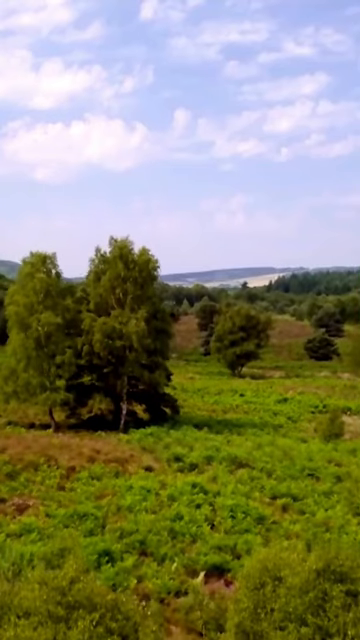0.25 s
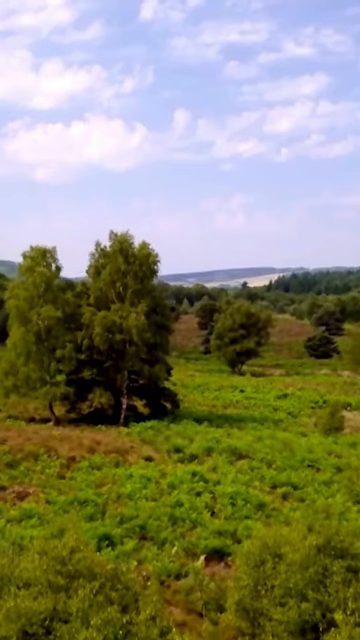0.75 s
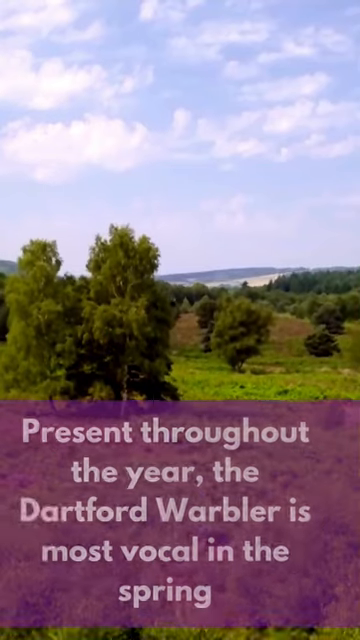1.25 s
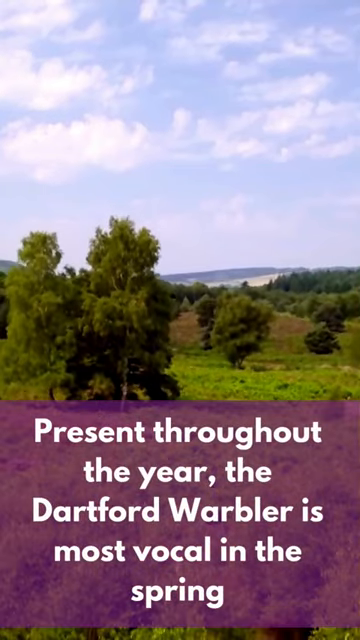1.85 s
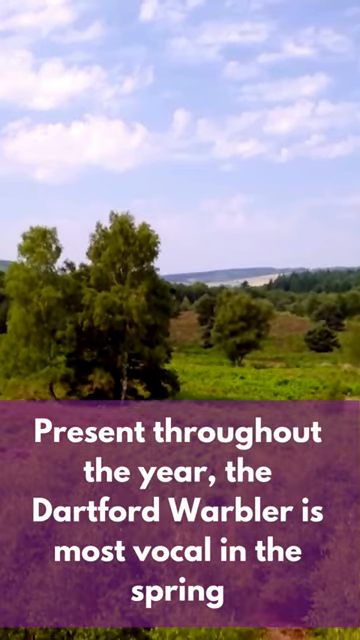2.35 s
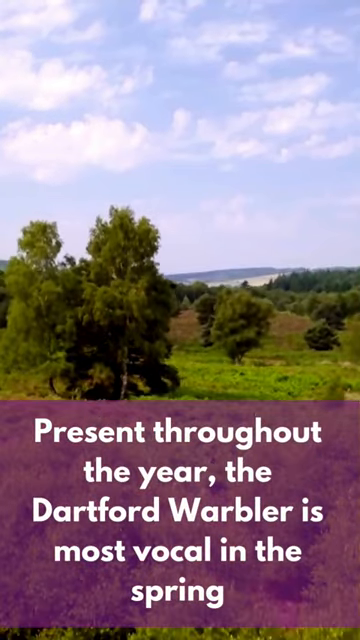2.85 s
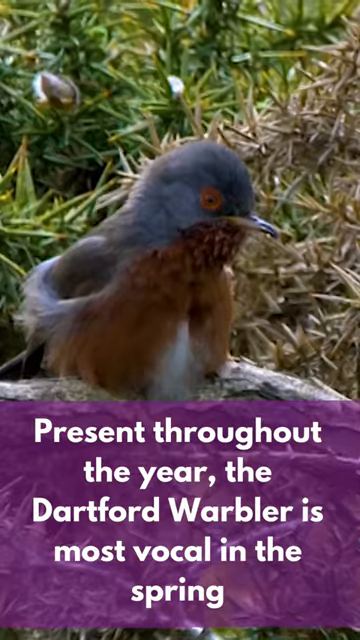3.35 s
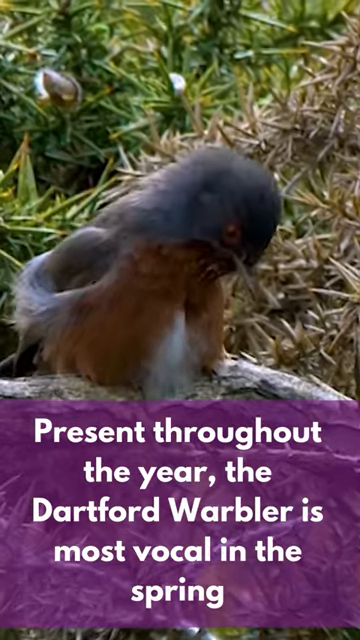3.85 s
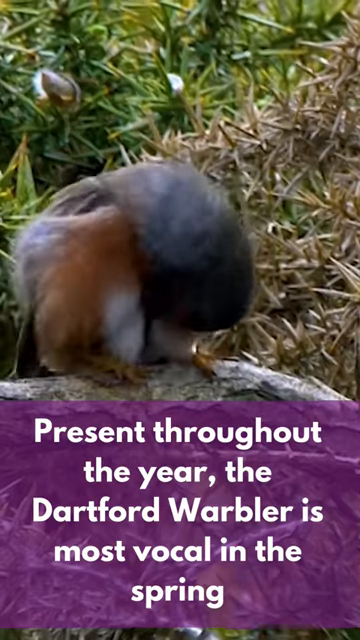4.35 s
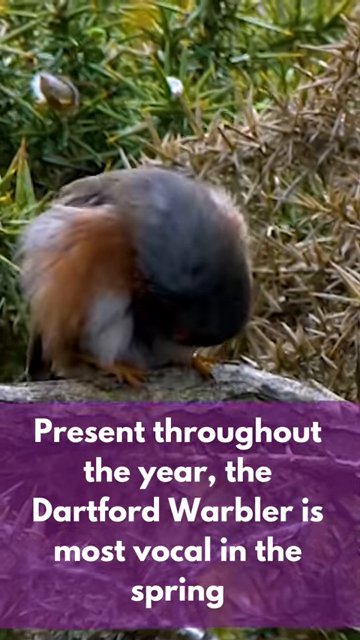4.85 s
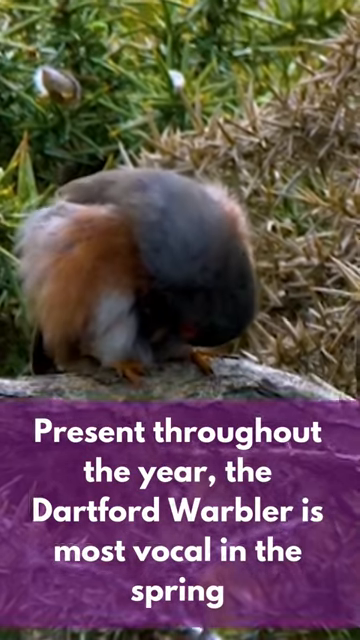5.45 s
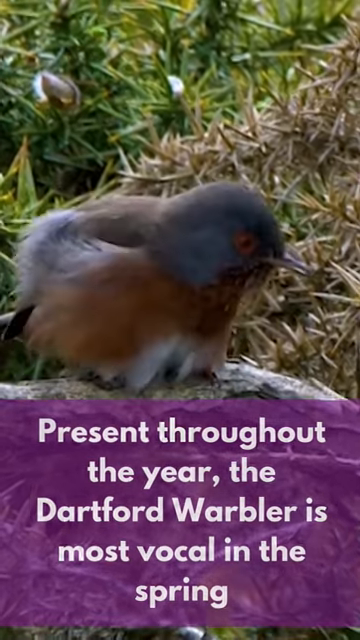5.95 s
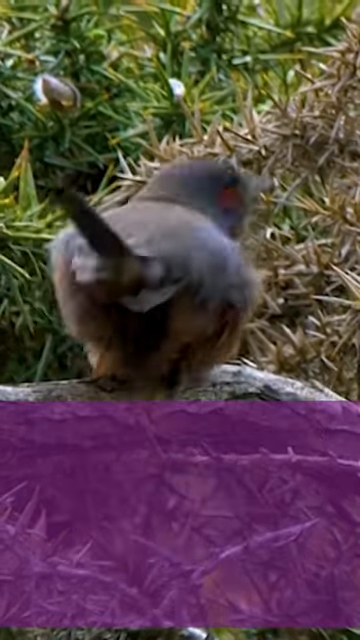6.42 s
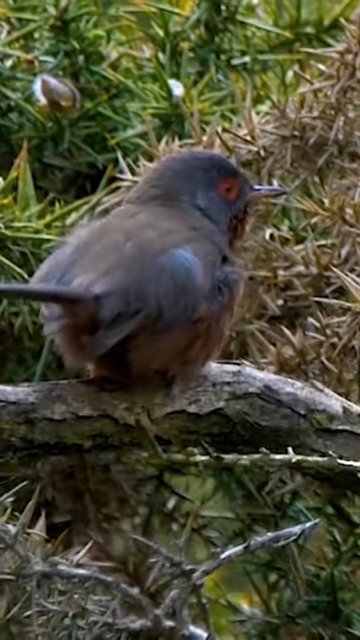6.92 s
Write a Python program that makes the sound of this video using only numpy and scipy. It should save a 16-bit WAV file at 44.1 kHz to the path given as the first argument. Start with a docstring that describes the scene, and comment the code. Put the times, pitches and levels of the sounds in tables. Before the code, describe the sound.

A rapid, scratchy warbler song fills the first third, clear and fairly near the microphone: rough buzzing, bright whistled strokes, fluttering trills, chattering rattles with upward flicks. It ends abruptly, leaving a hushed heath with low gusty rumble on the microphone, a faint airy rustle in gorse, sparse dry ticks, distant twitter, thin falling seeps and soft rising whistles from other birds far off.

```python
"""Harsh buzzes open a small warbler's scratchy bout, over wind rumbling on the microphone and rustling gorse.
The buzzes and hoarse rasps are stacks of fluttering harmonics; slurs, trills and rattles are bending tones.
Further off, near-pure tones make a rising whistle, thin falling notes, faint twitter and a low drone.
Shaped noise makes the wind and leaves, short noise bursts make twig ticks, and bushes return a short echo."""
import sys
import numpy as np
from scipy import signal
from scipy.fft import rfft, irfft
from scipy.io import wavfile
from scipy.ndimage import uniform_filter1d

SR = 44100
rng = np.random.default_rng(int(sys.argv[2]) if len(sys.argv) > 2 else 0)


def wav_out(sig):
    """Save sig, one row per channel (or a flat mono array), as 16-bit PCM at SR to the path in sys.argv[1]."""
    wavfile.write(sys.argv[1], SR, np.round(np.clip(np.atleast_2d(sig).T, -1, 1) * 32767).astype(np.int16))


N = 316638  # length of the scene in samples

# What the throat and beak let through. Each row: frequency in Hz, relative gain in dB.
THROAT_GAIN = [(700, -61), (1450, -21), (2300, -21.5), (2900, -8.5), (3500, 5.5), (3900, -3), (4400, 0),
               (5100, -6.5), (5700, -16), (6100, -28.5), (6700, -26.5), (7700, -38.5), (8800, -62.5),
               (12000, -67)]
RASP_HZ = 912  # middle pitch of the hoarse voice
SLUR_ROUGH, FLOURISH_ROUGH = .14, .25  # depth of the flutter in level


def undb(db):
    """Turn decibels into gain."""
    return 10 ** (np.asarray(db) / 20)


def colour(hz, table):
    """Look up the gain at the given frequencies in a table of Hz and dB."""
    table_hz, table_db = np.transpose(table)
    return undb(np.interp(np.log(np.maximum(hz, 1)), np.log(table_hz), table_db))


def slow(size, hz):
    """Smooth random wander of spread about 1 that changes about hz times a second."""
    k = max(int(SR / hz), 2)
    wander = rng.standard_normal(size + 4 * k)
    wander = uniform_filter1d(uniform_filter1d(wander, k), k)
    return wander[2 * k:2 * k + size] * np.sqrt(1.5 * k)  # smoothing shrank it


def noise(table):
    """Steady noise with the spectrum of a Hz and dB table, brought to rms 1."""
    spectrum = rfft(rng.standard_normal(N))
    hz = np.arange(N // 2 + 1) * SR / N
    hiss = irfft(spectrum * colour(hz, table), N)
    return hiss / hiss.std()


def add(out, s, x):
    """Mix x into out from time s in seconds."""
    i = int(s * SR)
    out[i:i + len(x)] += x[:N - i]


def edges(size, rise_s, fall_s):
    """Level that rises smoothly to 1, holds and falls smoothly."""
    t = np.arange(size) / SR
    ramp = np.clip(np.minimum(t / rise_s, t[::-1] / fall_s), 0, 1)
    return np.sin(np.pi / 2 * ramp) ** 2


def tone(hz, octave_db, rough):
    """Near sine of rms about 1 on a pitch track, with fluttering level and an octave filtered by the throat."""
    phase = 2 * np.pi * (np.cumsum(hz) / SR + rng.random())
    octave = undb(octave_db) * colour(2 * hz, THROAT_GAIN) * np.sin(2 * phase)
    flutter = 1 + rough * slow(len(hz), 500)
    return np.sqrt(2) * (np.sin(phase) + octave) * flutter


def slur(length, start_hz, mid_hz, end_hz, db, peak, rough):
    """One whistled stroke: pitch bends through three points, level swells to its peak and sinks."""
    u = np.linspace(0, 1, int(length * SR))
    hz = np.polyval(np.polyfit([0, .5, 1], [start_hz, mid_hz, end_hz], deg=2), u)
    hz = hz * (1 + 0.039 * rough * slow(len(u), 160))  # rough strokes also waver in pitch
    bend = np.log(.5) / np.log(np.clip(peak, .1, .9))  # puts the top of the swell at the peak
    swell = np.sin(np.pi * u ** bend) ** 0.99
    return undb(db) * swell * tone(hz, -1, rough)


def stack(hz, rough, bright_db, beak_hz, beak_db):
    """Pulsed voice box: 16 harmonics weighted by throat and beak, each fluttering alone, rms 1."""
    beak_width_hz = 450
    phase = 2 * np.pi * np.cumsum(hz) / SR
    voice = 0
    for k in range(1, 17):
        tilt_db = bright_db * np.log2(np.maximum(k * hz / 4500, 1))  # per octave above 4500 Hz
        beak_lift_db = beak_db * np.exp(-((k * hz - beak_hz) / beak_width_hz) ** 2)
        turn = k * phase + rng.uniform(0, 2 * np.pi)
        steady_part = np.sin(turn) * (1 + rough * slow(len(hz), 450))
        loose_part = rough * np.cos(turn) * slow(len(hz), 450)
        gain = colour(k * hz, THROAT_GAIN) * undb(tilt_db + beak_lift_db)
        voice = voice + gain * (steady_part + loose_part)
    return voice / voice.std()


def rasp(length, start_hz, end_hz, db):
    """A hoarse voice: a rough stack of harmonics whose pitch lurches about."""
    size = int(length * SR)
    hz = np.linspace(start_hz, end_hz, size) * (1 + 0.0692 * slow(size, 250))
    voice = stack(hz, 0.99, bright_db=11, beak_hz=6640, beak_db=6.5)
    return undb(db) * edges(size, 0.007, 0.006) * voice


def wind_rumble():
    """Wind on the microphone: low noise that swells and sinks in gusts."""
    # Gusts. Each row: time in seconds, level in dB before a small random wander.
    gusts = [(0.0, -67), (0.54, -62), (0.68, -68.5), (1.04, -67), (1.48, -72), (1.84, -61.5), (2.2, -70.5),
             (3.58, -72), (3.66, -66.5), (6.04, -67.5), (6.42, -70.5), (6.64, -57.5), (7.18, -63)]
    # Spectrum of the rumble. Each row: frequency in Hz, relative level in dB.
    rumble_spectrum = [(12, -50.5), (20, -17), (82, 1.5), (163, 1.5), (229, -4), (373, -10.5), (424, -15),
                       (455, -10.5), (1500, -34.5), (1950, -68.5), (3300, -120)]
    gust_db = np.interp(np.arange(N) / SR, *np.transpose(gusts))
    return undb(gust_db + 2.6 * slow(N, 25)) * noise(rumble_spectrum)


def rustling_leaves():
    """Rustling gorse: broad noise with a gentle swell; its treble level also varies randomly."""
    # Spectrum of the rustle. Each row: frequency in Hz, relative level in dB.
    air_spectrum = [(88, -35.5), (150, -8), (268, -14), (373, -7.5), (453, -10), (540, -13.5), (1940, -23),
                    (3280, -22.5), (4220, -19), (5440, -18.5), (6860, -22), (7860, -22.5), (15500, -34)]
    # Swell of the leaves. Each row: time in seconds, change in level in dB.
    leaf_swell = [(0, 0), (1.6, 1.5), (3.2, -2), (4.5, -0.5), (6.4, 0.5), (7.18, 3)]
    air_db = -71.5  # level before the swell
    swell_db = np.interp(np.arange(N) / SR, *np.transpose(leaf_swell))
    air = noise(air_spectrum)
    treble = signal.sosfilt(signal.butter(2, 3000, "high", fs=SR, output="sos"), air)
    treble_gain = undb(0.5 * swell_db + 2.07 * slow(N, 38))
    return undb(air_db + swell_db) * (air + (treble_gain - 1) * treble)


def far_twitter():
    """Faint twitter: 70 very rough little strokes at random times and pitches."""
    out = np.zeros(N)
    for when, pitch, bend, size in rng.random((70, 4)):
        hz = 4000 + 1750 * pitch
        end_hz = (.9 + .2 * bend) * hz
        add(out, when * N / SR, slur(.03 + .08 * size, hz, hz, end_hz, -89 + 5 * size, .4, 1.2))
    return out


def buzzes():
    """Harsh buzzes: a stack of harmonics whose pitch, level and beak resonance wobble together."""
    # Each row: start in seconds, length in seconds, first level in dB, last level in dB, before the wobble.
    buzz_times = [(.006, 0.22, -40.5, -35.5), (.356, 0.046, -38, -34.5), (.416, 0.049, -32.5, -45.5),
                  (.483, .170, -33.5, -36.5), (0.792, 0.0533, -34.5, -36), (.860, 0.054, -32, -50.5),
                  (.941, 0.068, -35.5, -36)]
    base_hz, crest_s, period_s = 700, .009, .0195  # pitch; first crest and period of the wobble
    out = np.zeros(N)
    for s, length, first_db, last_db in buzz_times:
        t = np.arange(int(length * SR)) / SR
        turn = 2 * np.pi * (t - crest_s) / period_s + 0.26 * slow(len(t), 40)
        # pitch arches up fast and sags in every wobble; the level dips between arches
        arch = np.cos(turn) + 0.5 * np.sin(2 * turn + 3.32)
        pitch = base_hz * (1 + .075 * arch + .018 * slow(len(t), 500))
        level_db = np.linspace(first_db, last_db, len(t)) + 1.3 * slow(len(t), 160)
        gain = undb(level_db) * (1 + .15 * np.cos(turn + 0.66)) * edges(len(t), .008, .010)
        beak_hz = 4162 + 560 * np.cos(turn + 1.2)
        add(out, s, gain * stack(pitch, .45, -12, beak_hz, 4.5))
    return out


def slurred_whistles():
    """Two groups of slurred whistles, each stroke a bending tone, with a short rasp between the groups."""
    # Each row: start in seconds, length in seconds, start, middle and end pitch in Hz,
    # peak level in dB, place of the peak from 0 to 1.
    slur_strokes = [(.278, .009, 6200, 5300, 3700, -26, .72), (.287, .030, 3950, 4880, 5200, -22.8, .45),
                    (.711, .006, 5600, 4800, 4000, -29, .45), (.716, .007, 4200, 3400, 2800, -38, .3),
                    (.718, .014, 5300, 5450, 5400, -43, .4), (.722, .014, 2900, 3400, 4200, -41, .7),
                    (.732, .024, 4100, 4450, 4500, -25, .36)]
    out = np.zeros(N)
    for s, *stroke in slur_strokes:
        add(out, s, slur(*stroke, SLUR_ROUGH))
    add(out, 0.57, rasp(0.035, RASP_HZ, RASP_HZ, -43.5))
    return out


def far_seeps():
    """Thin high notes far off: short strokes that fall by a random share of their pitch."""
    # Each row: start in seconds, level in dB.
    seep_times = [(.648, -70), (3.195, -77), (3.455, -79), (3.569, -73.5), (3.66, -80), (3.735, -72.5),
                  (3.885, -79), (4.0, -80), (4.334, -77), (4.48, -73.5), (4.621, -81), (4.74, -81.5),
                  (4.895, -74), (5.03, -72.5), (5.57, -74), (5.999, -79.5), (6.46, -79), (6.889, -77)]
    top_hz = 8310
    out = np.zeros(N)
    for s, db in seep_times:
        fall = rng.uniform(.12, .25)
        add(out, s, slur(.066, top_hz, (1 - 0.44 * fall) * top_hz, (1 - fall) * top_hz, db, 0.16, 0.4))
    return out


def far_drones():
    """Low drone far off: near-pure tones that wander a little in pitch and level."""
    # Each row: start in seconds, length in seconds, middle pitch in Hz, middle level in dB.
    drone_notes = [(.907, .46, 389, -75), (.91, .48, 525, -74), (1.575, .16, 337.5, -71.5),
                   (2.2, .32, 501, -79.5)]
    out = np.zeros(N)
    for s, length, hz, db in drone_notes:
        size = int(length * SR)
        gain = undb(db + 4.3 * slow(size, 27.6)) * edges(size, 0.034, 0.045)
        add(out, s, gain * tone(hz + 10 * slow(size, 30), -36, 0.081))
    return out


def trills():
    """Trills: a tone whose pitch swings fast while the voice nearly closes once in each wobble."""
    # Each row: start in seconds, length in seconds, opening, main and last pitch in Hz,
    # wobble period in seconds, first level in dB, last level in dB.
    trill_notes = [(1.009, 0.1145, 3062, 3046, 3190, .0097, -39, -41.5),
                   (1.277, .110, 3700, 3356, 3350, .014, -28.5, -38.5)]
    lead_s, lead_db = 0.0332, -6.5  # softer lead-in, where the wobble is shallow
    out = np.zeros(N)
    for s, length, open_hz, hz, last_hz, period, first_db, last_db in trill_notes:
        t = np.arange(int(length * SR)) / SR
        depth = np.clip(1 + (t - lead_s) / 0.025, .5, 1) ** 2
        turn = 2 * np.pi * (t - lead_s) / period + 0.12 * slow(len(t), 60)
        opening = 1 - depth * 0.87 * np.cos(turn / 2) ** 6
        level_times = [0.38 * lead_s, lead_s + period / 2, length]
        level_db = np.interp(t, level_times, [first_db + lead_db, first_db, last_db])
        fade = undb(level_db + 0.99 * slow(len(t), 59.15))
        track = np.interp(t, [0, .012, lead_s, length], [open_hz, hz, hz, last_hz])
        track = track - depth * 171 * np.cos(turn + 0.56) + 40 * slow(len(t), 119.3)
        add(out, s, fade * opening * edges(len(t), 0.0091, 0.0099) * tone(track, 4, 0.24))
    return out


def syllables():
    """Chips, rolls, rattles and scratches: set groups of bending strokes, each group over its rasp."""
    # Shape of each syllable, before small random scatter. Each row: delay in seconds, length in seconds,
    # start, middle and end pitch in Hz, level in dB against the syllable, place of the peak from 0 to 1.
    chip_shape = [(0, .0089, 3660, 4080, 5030, -10, 0.8), (.005, .009, 2794, 3547, 3336, -1, 0.81),
                  (.014, .019, 5086, 4335, 3250, -3.5, .6), (.030, .0032, 4400, 4080, 3630, -17.5, .54)]
    rattle_shape = [(0, 0.011, 3370, 3530, 3540, -5, 0.3), (.005, 0.0099, 4640, 4160, 3750, 2, 0.7)]
    roll_shape = [(0, .016, 3510, 3710, 3730, -1, .45), (.016, .014, 2915, 3450, 3500, 2, .5),
                  (.032, .010, 2900, 3500, 3750, 2, .5)]
    scratch_shape = [(.0076 * k, .009, 3150, 3600, 4300, -4 * (k % 2), .4) for k in range(6)]  # quick rising strokes
    # When each syllable is sung. Each row: start in seconds, level in dB.
    chip_times = [(1.171, -30), (1.439, -29), (1.516, -30.5)]
    rattle_times = [(1.802, -34), (1.833, -37.5), (1.863, -36), (1.897, -40), (1.93, -38.5), (2.116, -35.5),
                    (2.146, -37.5), (2.180, -41), (2.379, -58), (2.41, -43.5), (2.442, -46)]
    roll_times = [(1.747, -32)]
    scratch_times = [(2.060, -34.5), (2.320, -38)]
    # shape, times, level of the rasp in dB
    kinds = ((chip_shape, chip_times, -46.5), (rattle_shape, rattle_times, -43),
             (roll_shape, roll_times, -47), (scratch_shape, scratch_times, -46))
    out = np.zeros(N)
    for shape, sung, rasp_db in kinds:
        for s, db in sung:
            factor = 1 + .03 * rng.standard_normal()  # the whole syllable a little higher or lower
            for after, length, start_hz, mid_hz, end_hz, part_db, peak in shape:
                late, loud = rng.standard_normal(2) * (.0012, 2)  # scatter in seconds and dB
                pitches = start_hz * factor, mid_hz * factor, end_hz * factor
                add(out, s + after + late, slur(length, *pitches, db + part_db + loud, peak, .28))
            # the length of the rasp follows the last stroke
            add(out, s - .003, rasp(after + length + 0.0064, 1.08 * RASP_HZ, .92 * RASP_HZ, rasp_db))
    return out


def far_whistles():
    """Rising whistles far off: the pitch snaps up, then climbs slowly to a held note."""
    # Each row: start in seconds, length in seconds, held pitch in Hz, level in dB.
    whistle_notes = [(1.345, 0.24, 4330, -64), (2.183, 0.24, 4150, -57.5), (3.873, 0.22, 4200, -62),
                     (5.516, 0.254, 4187, -61)]
    snap, snap_s, climb, climb_s = .2, .022, .05, 0.067  # shares of the pitch to climb, and how fast
    out = np.zeros(N)
    for s, length, hz, db in whistle_notes:
        t = np.arange(int(length * SR)) / SR
        still_to_climb = snap * np.exp(-(t / snap_s) ** 2) + climb * np.exp(-t / climb_s)
        track = hz * (1 - still_to_climb) + 25 * slow(len(t), 45)
        add(out, s, undb(db) * edges(len(t), 0.034, 0.014) * tone(track, -37, 0.085))
    return out


def long_whistle():
    """One long falling whistle: a near-pure tone that follows a drawn line of pitch and level."""
    # Each row: time in seconds, pitch in Hz, level in dB.
    whistle_line = [(1.601, 6230, -60), (1.612, 5600, -45), (1.622, 4870, -28), (1.652, 4250, -30),
                    (1.715, 3880, -29.5)]
    s, hz, db = np.transpose(whistle_line)
    t = np.arange(s[0], s[-1], 1 / SR)
    gain = undb(np.interp(t, s, db)) * edges(len(t), .004, .006)
    out = np.zeros(N)
    add(out, s[0], gain * tone(np.interp(t, s, hz), -60, .11))
    return out


def flourishes():
    """Two-voiced endings of the rattles: an upper voice, a low stroke and a rising sweep over a rasp."""
    # Each row: start in seconds, top of the upper voice in Hz, its level in dB,
    # top of the sweep in Hz, its level in dB, level of the rasp in dB.
    flourish_notes = [(1.969, 5420, -38, 4850, -37.5, -42.5), (2.219, 5000, -43, 5530, -33, -46.5),
                      (2.487, 5370, -47, 5670, -39, -49)]
    # Low stroke: delay in seconds, length in seconds, start, middle and end pitch in Hz,
    # level in dB, place of the peak from 0 to 1.
    low_stroke = (.003, .013, 3050, 2930, 3100, -48, .4)
    sweep_after_s, sweep_s = .017, .025
    out = np.zeros(N)
    for s, upper_hz, upper_db, sweep_hz, sweep_db, rasp_db in flourish_notes:
        upper = slur(0.0296, .8 * upper_hz, .94 * upper_hz, upper_hz, upper_db, 0.45, FLOURISH_ROUGH)
        sweep = slur(sweep_s, .63 * sweep_hz, .88 * sweep_hz, sweep_hz, sweep_db, 0.46, FLOURISH_ROUGH)
        add(out, s, upper)
        add(out, s + low_stroke[0], slur(*low_stroke[1:], SLUR_ROUGH))
        add(out, s + sweep_after_s, sweep)
        add(out, s - .004, rasp(sweep_after_s + sweep_s, 0.66 * RASP_HZ, 1.1 * RASP_HZ, rasp_db))
    return out


def twig_ticks():
    """Twig ticks in the gorse: tiny bursts of brightened noise that die away at once."""
    # Each row: start in seconds, level in dB at the onset, before brightening.
    tick_times = [(3.3887, -64.5), (3.5598, -64), (4.3241, -66), (4.8504, -69.5), (5.9654, -60),
                  (6.3994, -74), (6.6169, -63.5), (7.1531, -57.5)]
    out = np.zeros(N)
    for s, db in tick_times:
        burst = signal.lfilter([1, -.6], 1, rng.standard_normal(600))
        add(out, s, undb(db) * np.exp(-np.arange(600) / 140) * burst)
    return out


def faint_call():
    """One faint high call near the end: a single bending stroke."""
    # Start in seconds, length in seconds, start, middle and end pitch in Hz,
    # level in dB, place of the peak from 0 to 1.
    call = (6.551, .21, 5800, 6000, 5950, -77, .5)
    out = np.zeros(N)
    add(out, call[0], slur(*call[1:], 0.27))
    return out


def echo(x):
    """Scattered returns from bushes close by, then a weaker wash from across the heath, as fading noise."""
    t = np.arange(SR // 2) / SR
    tail = 0
    for db, t60 in (-17.5, .33), (-27, .6):  # level in dB, seconds to fade by 60 dB
        part = rng.standard_normal(len(t)) * undb(-60 * t / t60) * (t > .003)
        tail = tail + undb(db) * part / np.linalg.norm(part)
    return x + signal.fftconvolve(x, tail)[:N]


def scene():
    """Birds with their echo, over the wind, leaves and twigs of the heath."""
    warbler = buzzes() + slurred_whistles() + trills() + syllables() + long_whistle() + flourishes()
    far_birds = far_twitter() + far_seeps() + far_drones() + far_whistles() + faint_call()
    heath = wind_rumble() + rustling_leaves() + twig_ticks()
    return (echo(warbler + far_birds) + heath)[None]


def record(dry):
    """Tones carry faint images a fixed step above and below; the loudest peaks are squashed; the top is cut."""
    image_hz, knee, over_knee = 3944, .075, .85  # step in Hz; level where squashing starts; slope above it
    turn = 2 * np.pi * image_hz * np.arange(N) / SR
    # multiplying by a cosine shifts copies up and down; the double step is fainter
    images = dry * 2 * (undb(-40) * np.cos(turn) + undb(-55) * np.cos(2 * turn))
    x = dry + signal.sosfilt(signal.butter(3, 600, "high", fs=SR, output="sos"), images)
    x = np.clip(x, -knee, knee) * (1 - over_knee) + over_knee * x
    return signal.sosfilt(signal.ellip(10, .2, 80, 15700, fs=SR, output="sos"), x)


dry = scene()
out = record(dry)
wav_out(out)
```